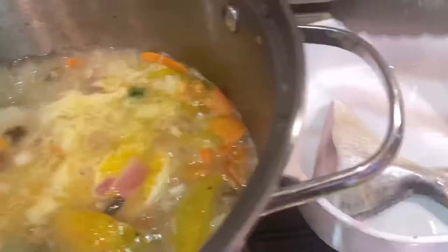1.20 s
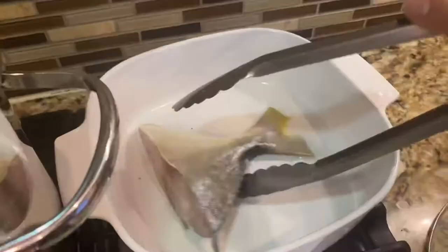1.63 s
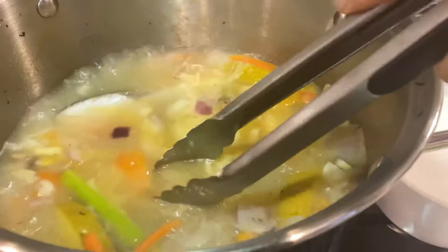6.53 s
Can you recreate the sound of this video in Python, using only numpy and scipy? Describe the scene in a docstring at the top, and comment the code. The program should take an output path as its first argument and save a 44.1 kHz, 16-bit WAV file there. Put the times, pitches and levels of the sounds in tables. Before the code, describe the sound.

Thick soup bubbles in a steel pot over a rumbling, hissing gas burner, with one sharp clack of metal tongs against a dish.

```python
"""Thick soup boils in a steel pot on a gas burner in a home kitchen, heard through a nearby phone.
From the start the flame rumbles and the gas jet hisses and sounds its tube, under a fine simmer and fizz.
Big bubbles burst and excite the air modes of the pot, and now and then a drop spits on the hot wall.
At 1.5 s metal tongs clack against a dish. The boil eases, then picks up from 5 s; the small bubbles
and the fizz follow it. At 7.15 s a light metal tap, probably the tongs, rings the pot."""
import sys
import numpy as np
from scipy import signal
from scipy.fft import rfft, irfft, next_fast_len
from scipy.io import wavfile

SR = 44100
rng = np.random.default_rng(int(sys.argv[2]) if len(sys.argv) > 2 else 0)


def to_wav(sig):
    """Store sig (one row per channel, or 1-D mono) as 16-bit WAV at the path in sys.argv[1].

    Samples outside -1..1 are clipped; the rate is SR.
    """
    pcm = np.clip(np.atleast_2d(sig), -1, 1) * 32767
    pcm = np.round(pcm).astype(np.int16)
    wavfile.write(sys.argv[1], SR, pcm.T)  # frames by channels


N = 337869
TIME = np.arange(N) / SR
# strength of the boil: t/s, level/dB
BOIL_LEVEL = [(0.0, -49.5), (0.4, -53), (0.87, -48.5), (1.4, -52.5), (1.98, -61.5), (5.03, -58.5),
              (5.1, -54.5), (6.55, -52), (7.1, -47.5), (7.32, -52.5), (7.66, -56.5)]


def undb(db):
    """Amplitude ratio of a level in decibels."""
    return 10 ** (np.asarray(db) / 20)


def unit(x):
    """Normalisation to an rms of 1."""
    return x / np.sqrt(np.mean(x ** 2))


def curve(rows):
    """Linear interpolation between rows of t/s, value."""
    return np.interp(TIME, *np.transpose(rows))


def fade(t, t60):
    """Exponential decay: 60 dB in t60 seconds."""
    return np.exp(-np.log(1000) * t / t60)


def wander(per_s):
    """Random modulation: a glide through per_s Gaussian values a second."""
    count = int(per_s * N / SR) + 2
    return np.interp(TIME * per_s, np.arange(count), rng.standard_normal(count))


def add(track, s, sound):
    """Superposition of a sound starting at s seconds."""
    i = max(int(s * SR), 0)
    part = sound[..., :max(N - i, 0)]
    track[..., i:i + part.shape[-1]] += part


def resonate(x, hz, width_hz):
    """Second-order resonator with gain 1 at its centre."""
    return signal.lfilter(*signal.iirpeak(hz, hz / width_hz, fs=SR), x)


def band(x, low_hz, high_hz):
    """Butterworth band-pass filter."""
    return signal.sosfilt(signal.butter(2, [low_hz, high_hz], "band", fs=SR, output="sos"), x)


def noise(spectrum, channels, size=N):
    """Uncorrelated noises shaped by rows of f/Hz, spectral density level/dB."""
    hz, db = np.transpose(spectrum)
    padded = next_fast_len(size)
    gain = undb(np.interp(np.log(np.fft.rfftfreq(padded, 1 / SR) + 1), np.log(hz), db))
    white = rng.standard_normal((channels, padded))
    return irfft(rfft(white) * gain, padded)[:, :size] * np.sqrt(SR / 2)


def ticks(per_s, size_db, channels):
    """Poisson process of clicks, mostly small with a few larger ones."""
    hits = rng.random((channels, N)) < per_s / SR
    out = np.zeros((channels, N))
    signs = rng.choice([-1, 1], hits.sum())
    out[hits] = signs * undb(size_db * np.minimum(rng.exponential(size=hits.sum()), 4))
    return out


def microphones(x, lead_s):
    """Path difference: sound reaches the left microphone lead_s before the right."""
    i = np.arange(len(x))
    return np.array([x, np.interp(i - np.round(lead_s * SR), i, x, left=0, right=0)])


def reflections(x, t60, wet_db, gap_s):
    """Reverberation: dense echoes from nearby surfaces, different at each microphone."""
    t = np.arange(int(t60 * SR)) / SR
    echoes = rng.standard_normal((2, len(t))) * fade(t, t60) * (t > gap_s)
    echoes /= np.sqrt(np.sum(echoes ** 2, axis=1, keepdims=True))
    return x + undb(wet_db) * signal.oaconvolve(x, echoes, axes=1)[:, :x.shape[1]]


def flame(flutter_db=2, flutters_per_s=22):
    """Combustion noise: a low rumble, amplitude-modulated as the flame flutters."""
    # rumble: f/Hz, density level/dB
    spectrum = [(15, -115), (24, -90), (31, -86), (42, -78), (62, -68.5), (85, -68), (115, -68.5),
                (150, -76), (200, -80), (270, -87), (600, -102), (2000, -130)]
    # its course: t/s, level/dB
    level = [(0, -46), (0.8, -50.5), (1.1, -47), (2.0, -51.5), (3.0, -51.5), (6.5, -51.5), (7.3, -48)]
    return unit(noise(spectrum, channels=1)) * undb(curve(level) + flutter_db * wander(flutters_per_s))


def gas_jet(crackles_per_s=600, crackle_db=-57.5):
    """Jet noise: the gas hisses from the right, with flurries of very fine crackle."""
    # hiss: f/Hz, density level/dB
    spectrum = [(2000, -115), (5000, -102), (6700, -99), (8400, -99), (10000, -99), (12000, -96.5),
                (14000, -99), (16000, -93)]
    # its course: t/s, gain/dB
    gain = [(0, 0), (1.3, -2), (2.9, -6.5), (3.7, -2.5), (7.66, -0.5)]
    hiss = noise(spectrum, channels=1)[0]
    grains = ticks(crackles_per_s * np.exp(0.6 * wander(per_s=22)), size_db=4.5, channels=1)
    grains = reflections(grains, t60=0.006, wet_db=-21, gap_s=0)[0]
    crackle = undb(crackle_db) * unit(band(grains, 7000, 15500))
    return microphones(hiss + crackle, lead_s=-8 / SR) * undb(curve(gain))


def burner_tube(diffuse_db=-4):
    """Pipe resonance: flow noise drives the tube's modes, heard directly and reflected off the hob."""
    # resonances: t/s, hum level/dB, whistle level/dB, top level/dB
    levels = [(0, -58.5, -67, -77), (1.2, -62.5, -66, -76), (1.5, -62.5, -63.5, -61),
              (3.3, -68, -64, -64.5), (4, -66, -67, -74), (4.4, -60.5, -63.5, -66), (6.4, -57, -64, -84),
              (7.66, -58.5, -65.5, -84)]
    # direction of the tube as the phone moves: t/s, left lead/s
    lead = [(3.5, -0.00018), (4.3, -0.00009)]

    def mode(hz, width_hz):
        direct = microphones(rng.standard_normal(N), curve(lead))
        flow = direct + undb(diffuse_db) * rng.standard_normal((2, N))
        return unit(resonate(resonate(flow, hz, width_hz), hz, width_hz))

    s, hum_db, whistle_db, top_db = np.transpose(levels)
    hum = mode(1684, 107) * undb(np.interp(TIME, s, hum_db))
    whistle = (mode(5017, 210) + undb(-10) * mode(5800, 280)) * undb(np.interp(TIME, s, whistle_db))
    top = mode(11500, 2600) * undb(np.interp(TIME, s, top_db))
    return hum + whistle + top


def kitchen():
    """Ambient noise: a steady background, uncorrelated between the microphones."""
    # room tone: f/Hz, density level/dB
    spectrum = [(30, -100), (100, -79.5), (180, -94), (260, -81.5), (340, -95.5), (550, -83.5),
                (900, -87.5), (1600, -92), (2800, -100), (4500, -100), (6500, -101.5), (9000, -108),
                (16000, -114)]
    return noise(spectrum, channels=2)


def bubble(t, hz, cycles, glide):
    """Helmholtz resonance: an opening cavity swells and dies; its pitch rises as the hole widens."""
    age = t * hz / cycles
    pitch = hz * (1 + glide * (np.tanh(age / 2) - .5))
    return age * np.exp(1 - age) * np.sin(2 * np.pi * np.cumsum(pitch) / SR)


def pot(x, lead_s, scatter_db, detune):
    """Cavity resonance: air modes shift with the steam and add unevenly to each side's direct sound."""
    # air above the soup: f/Hz, bandwidth/Hz, gain/dB
    air_modes = [(475, 48, 4), (611, 80, 3), (716, 32, 3.5), (1143, 56, 13.5), (1325, 37, -1.5),
                 (1740, 75, 5.5), (2354, 170, 9), (2860, 180, 18)]
    out = direct = microphones(x, lead_s)
    for hz, width, db in air_modes:
        shifted_hz = hz * np.exp(detune * rng.standard_normal())
        gains = undb(db + scatter_db * rng.standard_normal((2, 1)))
        out = out + gains * resonate(direct, shifted_hz, width)
    return out


def simmer(per_s=85, centre_hz=700, spread=0.54, size_db=2.5, patches=5):
    """Random excitation: small bubbles burst in patches of the surface and ring the air in the pot."""
    out, t = 0, np.arange(SR // 40) / SR
    for patch in np.array_split(rng.random((int(per_s * N / SR), 3)), patches):
        bursts = np.zeros(N)
        for when, size, pitch in patch:
            hz = centre_hz * np.exp(spread * np.sqrt(12) * (pitch - .5))
            gain = undb(-size_db * np.log(max(size, .04)))
            add(bursts, when * N / SR, gain * bubble(t, hz, cycles=0.4, glide=0.99))
        voiced = pot(bursts, lead_s=rng.uniform(0.00008, 0.00037), scatter_db=4.5, detune=0.013)
        out = out + reflections(voiced, t60=0.027, wet_db=-4, gap_s=0.00053)
    left_right_db = np.array([[-1], [-3]])
    return unit(out) * undb(curve(BOIL_LEVEL) + left_right_db)


def fizz(per_s=520, q=3, level_db=-63):
    """Shot noise: tiny droplets fizz round the hot wall, louder when the soup boils harder."""
    # broad peaks of the fizz: f/Hz, relative level/dB
    peaks = [(3600, -6), (4600, -8.5), (6600, -7)]
    out, rate = 0, per_s * np.exp(0.5 * wander(per_s=30))
    for hz, db in peaks:
        droplets = ticks(rate, size_db=8, channels=2)
        out = out + undb(db) * unit(resonate(resonate(droplets, hz, hz / q), hz, hz / q))
    boil_db = curve(BOIL_LEVEL)
    gain = undb(level_db + (boil_db - boil_db.mean()) / 3)
    return gain * unit(reflections(out, t60=0.018, wet_db=-9, gap_s=0.00013))


def neighbours(t, hz, count=4, within_s=0.01975, spread=0.468):
    """Cascade: a burst sets off a few small bubbles around it."""
    out = 0
    for when, size, pitch in rng.random((count, 3)):
        age = np.maximum(t - when * within_s, 0)
        out = out + size * bubble(age, hz * np.exp(spread * (2 * pitch - 1)), cycles=0.72, glide=0.395)
    return out


def big_bubbles(cycles=0.53, glide=0.053, steam_hz=1080, slump_hz=320, neighbour_db=-14, burst_s=0.02):
    """Impulse excitation of the pot's air: a cavity gulps, steam puffs, the film snaps and spatters."""
    # bursts: t/s, gulp level/dB, gulp f/Hz, puff level/dB, snap level/dB
    bursts = [(0.014, -41, 450, -61, -60), (0.029, -47, 530.0, -59, -68), (0.042, -45, 614, -57, -55.0),
              (0.049, -33.5, 624, -40, -56), (0.081, -46, 584, -67, -67), (0.097, -47, 570.0, -63.5, -65),
              (0.143, -49, 590.0, -53, -42.0), (0.165, -49, 570.0, -51, -66),
              (0.216, -66, 630.0, -55.5, -49.5), (0.249, -45, 530, -58, -64), (0.293, -41.5, 520, -59, -65),
              (0.33, -61.0, 550.0, -53.0, -61), (0.379, -62.0, 600.0, -53, -52.5),
              (0.421, -41.5, 530.0, -48, -63), (0.432, -46, 560.0, -45.0, -61.5),
              (0.555, -50, 487, -48.5, -70.5), (0.576, -47, 530, -63, -70.5), (0.603, -52, 515, -48.5, -62),
              (0.657, -62.0, 560.0, -60, -54), (0.69, -50, 553, -53, -65.5), (0.707, -45, 550, -52.5, -64),
              (0.841, -50, 557, -61, -55), (0.888, -48, 590.0, -52, -69), (0.904, -42, 567, -48, -70),
              (0.946, -62, 570.0, -48, -71), (0.985, -57, 630.0, -45.5, -71.0),
              (0.999, -46.0, 576, -43.5, -73), (1.017, -49, 550.0, -46, -74),
              (1.087, -46, 580.0, -46.5, -67), (1.117, -42, 557, -43, -60), (1.135, -41.5, 524, -42.5, -58),
              (1.256, -50, 626, -38.5, -74), (1.659, -53, 630.0, -54.0, -62), (2.082, -50.5, 623, -53, -66),
              (2.126, -46, 540.0, -65.0, -72.0), (2.176, -49, 576, -56.5, -54),
              (2.275, -64, 635, -47, -69.5), (2.564, -40.5, 590.0, -51, -65),
              (2.644, -51.5, 600, -50, -69.5), (3.064, -50, 536, -60, -67), (3.082, -49.0, 566, -55, -70),
              (3.211, -59, 560.0, -50, -59), (3.259, -45, 605, -47, -67.5), (3.537, -55, 590.0, -48.5, -63),
              (3.761, -49, 560.0, -49, -59), (4.126, -59, 570.0, -52, -55),
              (4.139, -47.5, 570.0, -53, -65.5), (4.238, -46, 544, -63.0, -72.5),
              (4.397, -45, 540, -50, -62), (4.509, -48.5, 560.0, -60.5, -69),
              (4.661, -55.0, 590.0, -55, -59), (4.683, -51, 600.0, -47.5, -47),
              (4.829, -58, 550.0, -49.5, -66.5), (4.988, -55, 560.0, -51, -68),
              (5.041, -42.5, 495, -50, -68), (5.12, -51.0, 577, -55, -69), (5.161, -61, 550.0, -50, -66),
              (5.227, -47, 554, -44.5, -68), (5.301, -48, 660, -48.0, -62.5),
              (5.389, -66.5, 590.0, -55, -65), (5.603, -53, 584, -58, -49.5), (5.676, -48.0, 646, -51, -64),
              (5.737, -50.5, 575, -50, -64.5), (5.744, -50.5, 640.0, -43.5, -69),
              (5.895, -51, 557, -55, -67.0), (5.964, -58, 590.0, -56, -52),
              (5.983, -62.0, 590.0, -52, -55.5), (6.034, -43.5, 624, -47, -54.5),
              (6.132, -56.0, 550.0, -47, -61), (6.298, -43.5, 515, -43, -71), (6.563, -44, 556, -48.5, -54),
              (6.57, -47.0, 550.0, -48.5, -47.5), (6.591, -57, 544, -57, -59),
              (6.734, -44, 587, -48.5, -72.0), (6.749, -64, 610.0, -47.5, -49.5),
              (6.866, -46, 543, -44, -49), (6.898, -53, 610.0, -49.0, -68), (6.911, -60, 600.0, -54, -65.5),
              (7.016, -48.5, 530.0, -47, -73), (7.031, -52, 580.0, -45, -60),
              (7.057, -48, 590.0, -43.5, -72), (7.109, -48.5, 590, -50, -70.0),
              (7.126, -51, 640, -56, -72.0), (7.136, -45.5, 610.0, -48, -62),
              (7.191, -48, 530.0, -56, -53.0), (7.218, -42, 530.0, -38.5, -50),
              (7.227, -44.5, 520, -47.5, -51.5), (7.253, -53, 590.0, -48, -49),
              (7.458, -52.5, 570.0, -50, -60), (7.587, -68.5, 600.0, -55.5, -60)]
    # the phone turns, leaving the pot on its left: t/s, left minus right/dB, left lead/s
    direction = [(.45, 1.5, 0.000082), (1.0, 11, 0.00038), (3.3, 13, 0.00048), (4.4, 5.5, 0.00014),
                 (5.0, 7, 0.00019), (7.66, 2.5, 0.00012)]
    when, pans, leads = np.transpose(direction)
    out, t = np.zeros((2, N)), np.arange(SR // 10) / SR
    for s, gulp_db, hz, puff_db, snap_db in bursts:
        film = band(band(rng.laplace(size=len(t)), 1300, 2400), 1300, 2400)
        spatter = undb(-17) * fade(t, 0.1)
        snap = film * (1 - fade(t, 0.0026)) * (fade(t, 0.027) + spatter)
        gulp = bubble(t, hz * np.exp(0.087 * rng.standard_normal()), cycles, glide)
        gulp += undb(neighbour_db) * neighbours(t, hz=600.5)
        # the thick soup slumps into the hole
        gulp += undb(-11 + 3 * rng.standard_normal()) * bubble(t, slump_hz, cycles, glide)
        puff = bubble(t, steam_hz * np.exp(0.11 * rng.standard_normal()), cycles=0.66, glide=glide)
        puff += undb(neighbour_db) * neighbours(t, hz=1111)
        # each bubble bursts at its own place on the surface
        pan_db = np.interp(s, when, pans) + 3.5 * rng.standard_normal()
        lead_s = np.interp(s, when, leads) + 0.00005 * rng.standard_normal()
        sides = unit(undb(np.array([[pan_db], [-pan_db]]) / 2))
        for part, db in ((gulp, gulp_db - 0.33), (puff, puff_db + 0.03), (snap, snap_db + 0.8)):
            voiced = pot(part, lead_s, scatter_db=1.2, detune=0.027)
            sound = reflections(voiced, t60=0.04, wet_db=-5, gap_s=0.00066)
            # same energy as an rms of 1 held for burst_s
            sound /= np.sqrt(np.sum(sound ** 2, axis=1, keepdims=True) / (burst_s * SR))
            add(out, s + 0.00053, undb(db) * sides * sound)
    return out


def ring(t, modes, swell_cycles, rattle):
    """Modal vibration of struck metal: low modes swell more slowly, and rattling roughens them all."""
    out = 0
    for hz, db, t60 in modes:
        # a quarter cycle apart at the two microphones
        phase = rng.random() + rng.choice([-1, 1]) * np.array([[1], [-1]]) / 8
        rough = 1 + rattle * wander(per_s=330)[:len(t)]
        envelope = (1 - fade(t, swell_cycles / hz)) * fade(t, t60)
        out = out + undb(db) * rough * envelope * np.sin(2 * np.pi * (hz * t + phase))
    return out


def spits_and_tap(knock_db=-3, ring_db=-17):
    """Impact excitation: drops spit on the hot wall; a metal tap, probably the tongs, rings the pot."""
    # spits, and last the tap: t/s, level/dB, noise centre f/Hz, t60/s
    impacts = [(0.198, -55, 11000, 0.025), (0.231, -47, 10960, 0.049), (0.324, -50, 4280, 0.03),
               (0.898, -56, 6490, 0.03), (5.003, -50.5, 5150, 0.078), (5.256, -47, 4000, 0.14),
               (6.409, -52, 4400, 0.062), (7.123, -51, 4630, 0.03), (7.1530, -30, 2320, 0.032)]
    # steel wall of the pot: f/Hz, relative level/dB, t60/s
    wall_modes = [(1110, 12.5, 0.083), (1880, 15.5, 0.043), (2224, 3, 0.1), (2530, 8, 0.14),
                  (2880, 0, 0.12), (4700, 9, 0.05), (6430, 7, 0.11)]
    out, t = np.zeros((2, N)), np.arange(SR // 4) / SR
    for s, db, hz, t60 in impacts:
        tick = unit(band(rng.laplace(size=(2, len(t))), .5 * hz, 2 * hz)) * fade(t, t60)
        knock = undb(knock_db) * bubble(t, hz=700, cycles=0.54, glide=0.1)
        wall = undb(ring_db) * ring(t, wall_modes, swell_cycles=6, rattle=0.11)
        add(out, s, undb(db) * (knock + tick + wall))
    return out


def tongs(ring_db=-25.5, free_s=0.052, dish_hz=736, dish_db=-52.5):
    """Damped free vibration: steel chatters on the dish and rings until gripped; the dish hums on."""
    # chatter: t/s, gain/dB
    contacts = [(1.5099, -2.5), (1.5129, -5), (1.5174, -11), (1.522, -11), (1.5311, -18), (1.5683, -25)]
    # crack of one contact: f/Hz, density level/dB
    crack = [(100, -84), (300, -62), (700, -60), (1400, -78.5), (2500, -64), (4600, -68), (7500, -67),
             (9500, -83), (12000, -75), (16000, -80)]
    # tongs and dish: f/Hz, relative level/dB, t60/s
    modes = [(234, -18, 0.36), (468, -18.5, 0.48), (572, -9, 0.97), (738, -3.5, 0.51), (1267, 2, 0.079),
             (1353, 2, 0.063), (1480, 4, 0.061), (1683, -16, 0.15), (2192, 2.5, 0.12), (2340, -2, 0.14),
             (2357, 0.5, 0.095), (3170, -8.5, 0.071), (3539, -5.5, 0.16), (4420, -7.5, 0.07),
             (4680, -5, 0.045), (5120, -9, 0.1), (7000, -11, 0.075), (7530, -13, 0.06), (7900, -9.5, 0.11),
             (9760, -15, 0.075), (10720, -1, 0.055)]
    out, t, start = np.zeros((2, N)), np.arange(SR) / SR, contacts[0][0]
    for s, db in contacts:
        add(out, s, undb(db) * noise(crack, channels=2, size=SR) * fade(t, t60=0.054))
    grip = fade(np.maximum(t - free_s, 0), t60=0.005)
    add(out, start, undb(ring_db) * grip * ring(t, modes, swell_cycles=26, rattle=0.47))
    add(out, start, undb(dish_db) * fade(t, t60=2.3) * np.sin(2 * np.pi * dish_hz * t))
    return out


def scene():
    """Superposition: pot and tongs reverberate briefly in a small kitchen, over the burner."""
    steady = flame() + gas_jet() + burner_tube() + kitchen()
    near = simmer() + fizz() + big_bubbles() + spits_and_tap() + tongs()
    return steady + reflections(near, t60=0.092, wet_db=-10, gap_s=0.01)


def record(dry):
    """Band limiting: the phone's steep low-pass filter cuts the highest treble."""
    return signal.sosfilt(signal.ellip(10, .2, 70, 15750, fs=SR, output="sos"), dry)


dry = scene()
out = record(dry)
to_wav(out)
```